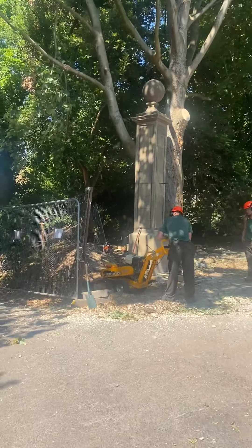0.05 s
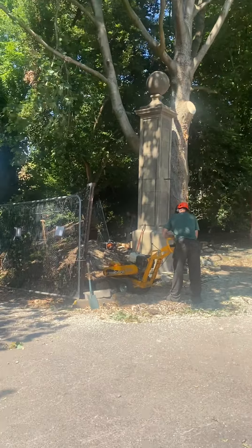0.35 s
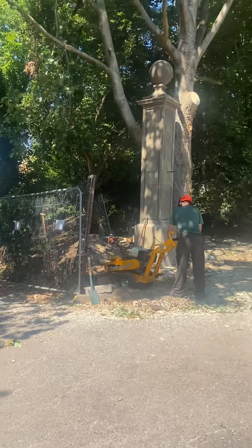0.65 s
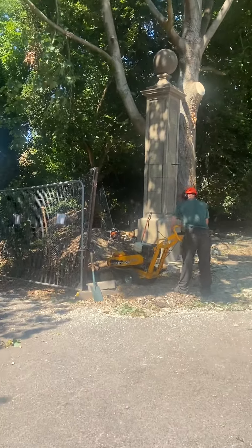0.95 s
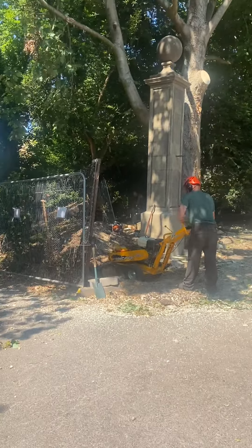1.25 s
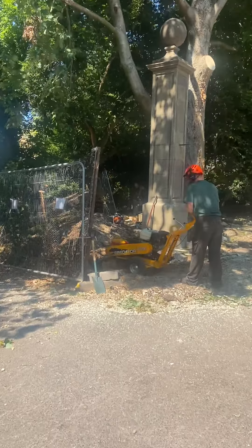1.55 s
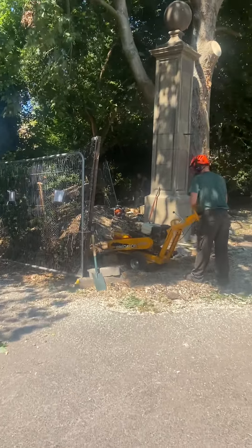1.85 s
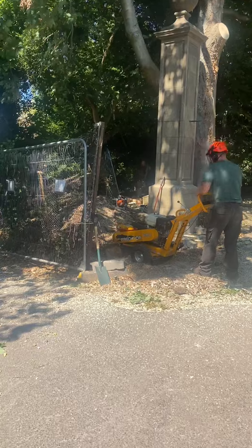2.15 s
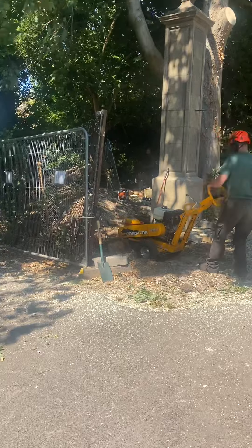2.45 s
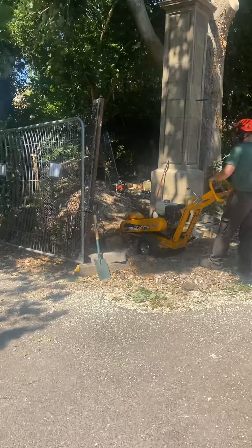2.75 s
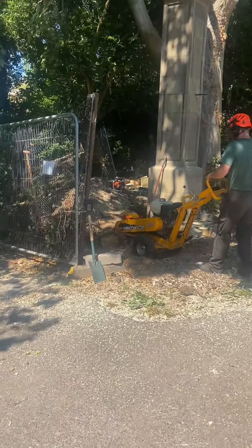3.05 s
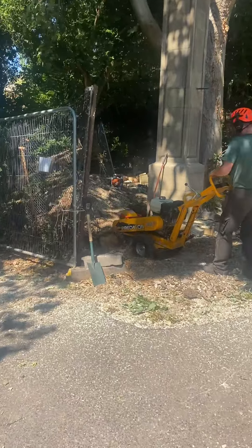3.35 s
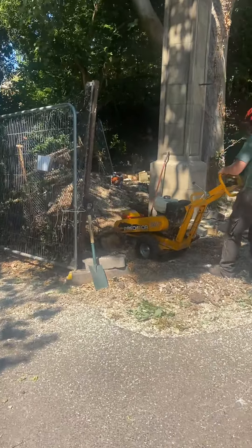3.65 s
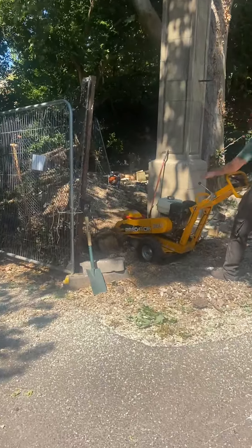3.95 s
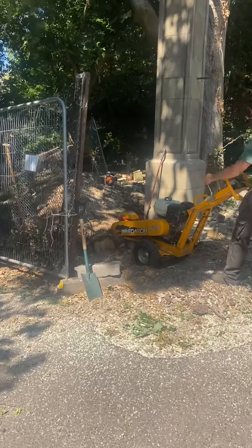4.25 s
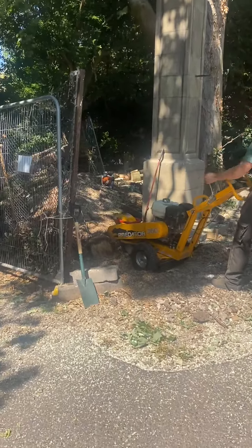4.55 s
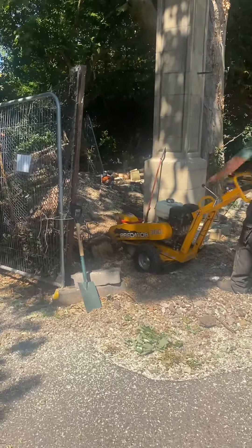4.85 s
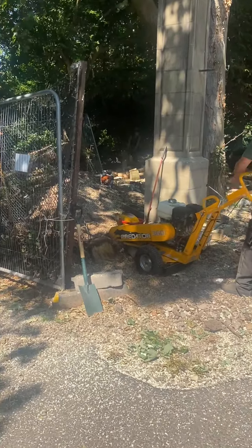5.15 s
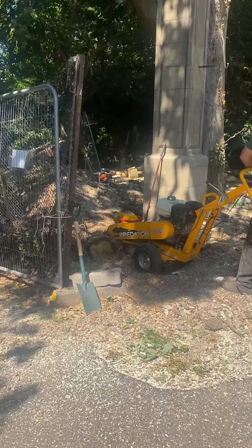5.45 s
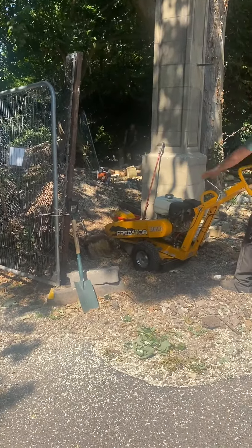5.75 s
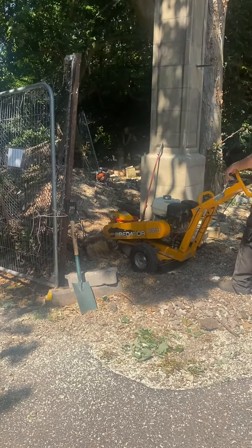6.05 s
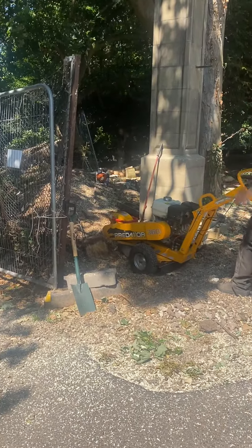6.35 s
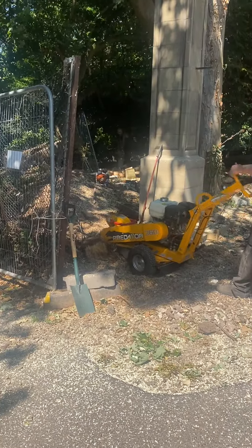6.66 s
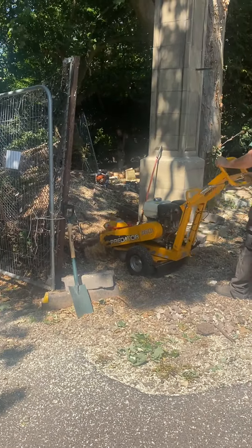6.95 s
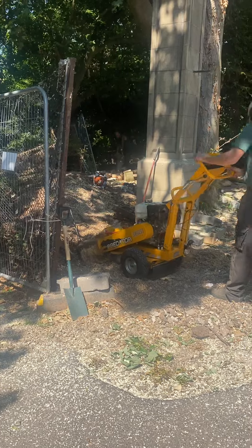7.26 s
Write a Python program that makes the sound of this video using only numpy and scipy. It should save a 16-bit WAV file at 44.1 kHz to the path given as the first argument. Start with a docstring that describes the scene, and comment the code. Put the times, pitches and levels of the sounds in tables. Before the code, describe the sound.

A stump grinder runs at full throttle outdoors, its throbbing engine and clattering cutter wheel growing louder as it gets closer.

```python
"""Stump grinder, approached on foot.

A walk-behind grinder runs at full throttle on a drive. Its single-cylinder four-stroke engine throbs
through muffler and airbox, knocks, and now and then misfires. The belt-driven cutter wheel hums and
churns through chips, narrow ringing bands come and go, and a few stones clink against the guard."""
import sys
import numpy as np
from scipy import signal
from scipy.fft import rfft, irfft
from scipy.io import wavfile
from scipy.ndimage import uniform_filter1d

SR = 44100
rng = np.random.default_rng(int(sys.argv[2]) if len(sys.argv) > 2 else 0)


def master(y):
    """Save y as 16-bit WAV."""
    cut = np.clip(np.atleast_2d(y).T, -1, 1)
    pcm = np.round(cut * 32767)  # scale
    wavfile.write(sys.argv[1], SR, pcm.astype(np.int16))


N = 326340
TIME, FREQ = np.arange(N) / SR, np.fft.rfftfreq(N, 1 / SR)
CYCLE_S = .0327  # nominal engine cycle: two crank turns, one firing

# walk to the machine (time [s], share of the way [0-1], exhaust level [dB], intake level [dB])
WALK = [(0, 0.14, -0.4, 1), (1.6, 0.2, 1.5, 0.5), (2.8, 0.44, 2, 1.6), (3.8, 0.63, 3.5, 1),
        (4.7, 0.63, 2.5, 2.5), (5.9, .84, 2.5, 2.5), (7.4, 1, 3, 4)]


def amp(db):
    """Decibels to gain."""
    return 10 ** (np.asarray(db) / 20)


def unit_rms(x):
    """Scale to rms 1."""
    return x / np.sqrt(np.mean(x ** 2) + 1e-20)


def follow(rows):
    """Each column of a time table at every sample."""
    times, *columns = np.transpose(rows)
    return [np.interp(TIME, times, column) for column in columns]


def gains(points):
    """(frequency [Hz], level [dB]) table to a gain per bin."""
    hz, db = np.transpose(points)
    return amp(np.interp(np.log(FREQ + 1), np.log(hz + 1), db))


def rolloff(hz, order):
    """Low-pass gain per bin."""
    return 1 / (1 + (FREQ / hz) ** order)


def colour(x, gain):
    """Filter by a gain per bin."""
    return irfft(rfft(x) * gain, N)


def wander(rate_hz):
    """Slow noise, rms 1."""
    return unit_rms(colour(rng.standard_normal(N), rolloff(rate_hz, 4)))


def narrow_noise(centre_hz, width_hz):
    """Noise band around a moving centre, rms 1."""
    r = np.exp(-np.pi * width_hz / SR)
    a, b = signal.lfilter([1], [1, -2 * r, r * r], rng.standard_normal((2, N)))
    angle = 2 * np.pi * np.cumsum(centre_hz) / SR
    return unit_rms(a * np.cos(angle) + b * np.sin(angle))


def clicks(cycles, spread_db):
    """One impulse of uneven size per cycle."""
    count = np.floor(cycles)
    return np.diff(count, prepend=count[0]) * amp(spread_db * rng.standard_normal(N))


def ring(x, modes):
    """Damped modes; neighbours swing in opposite directions, as along a pipe."""
    t = TIME[:SR // 4]
    response = sum((-1) ** k * amp(db) * np.exp(-np.pi * width_hz * t) * np.sin(2 * np.pi * hz * t)
                   for k, (hz, width_hz, db) in enumerate(modes))
    return signal.oaconvolve(x, response)[:N]


def nearness(close_share=0.74):
    """0 far from the machine, 1 close to it."""
    return np.clip(follow(WALK)[0] / close_share, 0, 1)


def misfires():
    """Every missed cycle as (time [s], strength)."""
    # misfire runs (start [s], length [cycles], strength [relative])
    runs = [(.583, 2, .9), (.876, 1, 1), (1.203, 1, 1), (1.695, 1, .45), (1.892, 1, 1.1), (3.294, 1, .45),
            (3.458, 3, 1), (3.723, 2, 1), (5.287, 4, 1), (5.715, 4, 1), (7.355, 2, 1)]
    return [(s + k * CYCLE_S, strength) for s, count, strength in runs for k in range(round(count))]


def firing_hz(sag_hz=.151, recover_s=.409):
    """Each misfire costs a little speed, which the governor wins back."""
    # governed speed, hunting slowly (time [s], cycle rate [Hz])
    governor = [(0, 30.291), (.4, 30.816), (.72, 30.99), (1.535, 30.571), (2.1, 30.677), (2.778, 30.839),
                (3.44, 30.549), (3.9, 30.718), (4.351, 30.966), (5.2, 30.8), (5.6, 30.651), (5.992, 30.512),
                (6.404, 30.853), (6.9, 30.755), (7.4, 30.562)]
    sag = sum(strength * (TIME > s) * np.exp(-abs(TIME - s) / recover_s) for s, strength in misfires())
    return follow(governor)[0] - sag_hz * sag


def engine(cycles, misfire_loss=0.87, backflow_phase=.203, intake_phase=.492):
    """Blasts ring the muffler, gulps the airbox; a misfire weakens the blast and sucks gas back."""
    # resonances (frequency [Hz], width [Hz], level [dB])
    muffler = [(88.7, 6.5, -25.5), (102.4, 29.7, -12.5), (165.6, 41, -10.5), (291, 33, -18)]
    airbox = [(65.7, 16.8, -18.5), (117.45, 20.1, -11.5)]
    tin_shroud = [(381, 150, -35.5)]
    backflow = [(79, 20.8, -10), (87.2, 20, -18.5), (151, 24, -12)]
    # deepest throb (time [s], level [dB])
    bass_level = [(0, -3), (1.6, -1.5), (2.2, -3), (3.1, -6), (3.8, 3), (4.6, -3.5), (5.6, 2.5), (7.4, -1)]
    _, exhaust_db, intake_db = follow(WALK)
    missed = sum(strength * (abs(TIME - s) < CYCLE_S / 2) for s, strength in misfires())
    blasts = clicks(cycles, spread_db=0.54) * (1 - misfire_loss * missed)
    sucks = clicks(cycles - backflow_phase, spread_db=3.6) * missed * amp(intake_db)
    gulps = clicks(cycles - intake_phase, spread_db=0.5) * amp(intake_db)
    # dull pop: the lowest mode swings against the upper ones
    pops = ring(sucks, backflow[:1]) - sum(ring(sucks, [mode]) for mode in backflow[1:])
    throb = ring(blasts * amp(exhaust_db), muffler) + pops + ring(gulps, airbox)
    throb += nearness() * ring(blasts, tin_shroud)
    throb += (amp(follow(bass_level)[0]) - 1) * colour(throb, rolloff(80, 10))
    upper_throb = colour(throb, 1 / (1 + ((FREQ - 289) / 29) ** 2))
    return throb - nearness() * upper_throb


def wheel_hum(cycles, wheel_ratio, slip_turns=.009, flutter_db=0.97):
    """Eight teeth beat the air; the belt slips a little."""
    # partials (order [per wheel turn], level [dB])
    orders = [(3, -17.5), (4, -2), (8, 0.2), (10, -20), (12, -14), (16, -16), (18, -21), (20, -20)]
    # hum envelope (time [s], level [dB])
    hum_level = [(0, -29.5), (.6, -30.5), (.95, -29.5), (1.42, -26), (1.7, -29.5), (2.15, -31.5),
                 (2.45, -26.5), (2.8, -28.5), (3.2, -36), (3.53, -32), (3.75, -29), (4.3, -25),
                 (4.8, -26.5), (5.25, -32), (5.95, -26.5), (6.1, -27.5), (6.25, -33.5), (6.8, -32.5),
                 (7.4, -26)]
    angle = 2 * np.pi * (wheel_ratio * cycles + slip_turns * wander(3.7))
    hum = sum(amp(db + flutter_db * wander(6.7)) * np.sin(round(k) * angle + 2 * np.pi * rng.random())
              for k, db in orders)
    return amp(follow(hum_level)[0] - 0.14) * hum


def knocks(cycles, tail_s=0.024):
    """Valves and piston ring the crankcase, each knock alike from cycle to cycle."""
    # knocks (phase [cycles], level [dB], centre [Hz], decay [s])
    impacts = [(.01, -9, 592, 0.0049), (.02, -12, 3850, 0.0085), (.285, -8, 860, 0.0013),
               (0.408, -15, 1712, 0.0019), (.6, -13, 1603, 0.013)]
    out, t = np.zeros(N), TIME[:SR // 20]
    for phase, db, hz, decay_s in impacts:
        crankcase = rng.standard_normal(len(t)) * (np.exp(-t / decay_s) + 0.79 * np.exp(-t / tail_s))
        hits = unit_rms(signal.oaconvolve(clicks(cycles - phase, spread_db=1.0), crankcase)[:N])
        band = 1 / np.sqrt(1 + (FREQ / hz - hz / FREQ.clip(1)) ** 2)
        out += amp(db) * colour(hits, band)
    return out


def chip_flow(rate_hz=9, slowest_hz=2):
    """Uneven flow of chips through the wheel, no slow drift, rms 1."""
    return unit_rms(colour(wander(rate_hz), FREQ > slowest_hz))


def treble_flicker(x, ripple_db=2.3, flicker_db=3.0, above_hz=1950):
    """Random slow ripple and brief patches make the treble flicker and shift in colour."""
    hz, t, spectrum = signal.stft(x, SR, nperseg=1024, noverlap=768)

    def patches(width_hz, length_s):
        """Random field over frequency and time, rms 1."""
        field = uniform_filter1d(rng.standard_normal(spectrum.shape), round(width_hz / hz[1]), axis=0)
        return unit_rms(uniform_filter1d(field, round(length_s / t[1]), axis=1))

    db = ripple_db * patches(100, .7) + flicker_db * patches(130, .08)
    db /= 1 + (above_hz / hz.clip(1)[:, None]) ** 3
    gain = amp(db) / np.sqrt(np.mean(amp(db) ** 2, axis=1, keepdims=True))
    return signal.istft(spectrum * gain, SR, nperseg=1024, noverlap=768)[1][:N]


def clatter(cycles, wheel_ratio, churn_db=1.14, knock_db=4.0, split_hz=1800):
    """Knocks plus chip noise that swells once a wheel turn; louder and fuller close by."""
    # clatter spectra, far and close (frequency [Hz], level [dB])
    far_shape = [(220, -28.5), (370, -9.5), (492, -1.5), (590, -11.5), (800, -8), (1150, -8.5),
                 (1650, -11.5), (1860, -16.5), (2090, -16.5), (2750, -17.5), (3870, -23.5), (4300, -23.5),
                 (5200, -28), (6300, -48), (8000, -79)]
    close_shape = [(220, -35), (370, -3.5), (590, -2.5), (730, -1.5), (880, -4.5), (1100, -6), (1450, -11),
                   (1850, -10), (2450, -13.5), (3200, -16.5), (3800, -18), (4500, -21.5), (5200, -22.5),
                   (5550, -34.5), (6300, -55), (8000, -80)]
    swell = 1 + .14 * np.cos(2 * np.pi * wheel_ratio * cycles)
    knocking = amp(knock_db) * knocks(cycles)
    near, low = nearness(), rolloff(split_hz, 8)
    out = np.zeros(N)
    for band, far_db, close_db in ((low, -35.5, -26.5), (1 - low, -41.5, -38)):
        drive = rng.standard_normal(N) * swell * amp(churn_db * chip_flow()) + knocking
        far = unit_rms(colour(drive, band * gains(far_shape)))
        close = unit_rms(colour(drive, band * gains(close_shape)))
        out += amp(far_db + near * (close_db - far_db)) * ((1 - near) * far + near * close)
    return treble_flicker(out)


def reflections(x, above_hz=1000, below_hz=3900):
    """Three early bounces comb the lower treble; rough ground scatters the rest."""
    # ground bounce, lagging more on approach (time [s], delay [s])
    ground = [(0, .00165), (1.2, .00165), (1.4, .00156), (2, .00172), (2.6, .00178), (3.4, .00182),
              (4.7, .00185), (5.25, .00221), (6.1, .00229), (6.6, .00222), (7.1, .0021), (7.4, .00212)]
    delay_s = follow(ground)[0]
    treble = colour(x, (1 - rolloff(above_hz, 3)) * rolloff(below_hz, 6))
    paths = ((-.29, delay_s), (.15, delay_s + .00059), (.14 * nearness(), .00079))
    return x + sum(gain * np.interp(TIME - lag_s, TIME, treble) for gain, lag_s in paths)


def ringing_bands(cycles, floor=0.098, flutter_db=0.5, pulse_db=3.0, pulse_phase=0.17):
    """Narrow ringing noise bands swell, glide and fade during the walk, pulsing each engine cycle."""
    # bands (centre [Hz], width [Hz], level [dB], peak time [s], swell sigma [s], glide [Hz/s])
    bands = [(411, 35, -38.5, 0.17, .17, 0.5), (681, 87, -43.5, .3, .7, 0.5),
             (771.5, 100, -33, 4.45, .5, 0), (2800, 170, -48.5, 0.65, 0.39, 1),
             (723, 76, -38.5, 7.4, .41, 0), (1069, 54, -42.5, 5, 0.85, 0.5),
             (1338, 95, -38.5, 2.45, .5, -69.5), (1205, 200, -41.5, 3.5, .6, 0),
             (1664, 78, -43.5, 0.56, 0.53, 0), (1446, 53, -46.5, 0.27, .3, 1.5),
             (1471, 130, -43, 5.2, 0.75, 0), (2060, 60, -46.5, 5.3, 1, 1), (2130, 60, -47, 7.2, .25, 150),
             (2374, 56, -43.5, 5.62, 0.6, -0.5), (2535, 44, -48.5, 3.4, 0.49, -1),
             (2460, 80, -47, 7.1, .35, 200.5), (2635, 130, -46.5, 2.15, .45, -260),
             (2670, 87, -47.5, 4.4, 0.18, -1100), (2935, 50, -44, 6.36, .32, 69.5),
             (3100, 70, -47.5, 7.2, .22, 220), (2964, 130, -46.5, 4.2, 0.45, 0),
             (3470, 80, -46.5, 3.55, .14, 0), (3600, 190, -47, 4.25, 0.25, -150),
             (3810, 170, -46, 1.12, .17, 99.5), (3880, 110, -51, 4.85, 0.19, -1200),
             (3850, 80, -55, 4.9, .2, 0), (3850, 60, -51, 6, .22, 120.5),
             (4150, 70, -52.5, 7.15, 0.14, 200.5)]
    pulse = np.cos(2 * np.pi * (cycles - pulse_phase)) - 0.17
    gain = amp(flutter_db * chip_flow() + pulse_db * pulse)
    out = np.zeros(N)
    for hz, width_hz, db, peak_s, sigma_s, glide in bands:
        swell = floor + (1 - floor) * np.exp(-.5 * ((TIME - peak_s) / sigma_s) ** 2)
        centre_hz = hz + glide * np.clip(TIME - peak_s, -2 * sigma_s, 2 * sigma_s)
        out += amp(db) * swell * narrow_noise(centre_hz, width_hz)
    return gain * out


def exhaust_rumble(cycles, level_db=-33.5, puff_db=2.5, puff_phase=0.26):
    """Low noise of exhaust gas, rushing once a cycle."""
    # gas noise spectrum (frequency [Hz], level [dB])
    shape = [(20, -18), (45, -6.5), (90, -3.5), (170, 0), (280, 0), (400, -10), (600, -13.5), (1500, -50.5)]
    puff = np.cos(2 * np.pi * (cycles - puff_phase))
    gas = unit_rms(colour(rng.standard_normal(N), gains(shape)))
    return amp(level_db + follow(WALK)[2] + puff_db * puff) * gas


def stones(scrape_decay_s=0.007, ping_decay_s=0.014):
    """Stones and chips scrape and ring the steel guard, each spot with its own note."""
    # strikes (time [s], scrape level [dB], note [Hz], note level [dB])
    strikes = [(0.029, -39, 3030, -29), (0.047, -42.5, 3080, -32.5), (1.35, -30.5, 1405, -26.5),
               (1.358, -27, 3030, -27.5), (1.37, -25.5, 3400, -45), (1.378, -30.5, 1664, -29),
               (1.381, -39.5, 643, -24.5), (1.384, -34.5, 1497, -29.5), (1.396, -36, 4274, -44),
               (1.412, -37, 2100, -32), (1.436, -45.5, 3630, -37), (1.49, -37.5, 3000, -36),
               (1.532, -40, 2940, -39), (4.703, -26, 726, -17), (6.046, -39.5, 2970, -36),
               (6.372, -36, 1404, -25.5), (7.283, -28, 3260, -32)]
    # guard modes (frequency [Hz], width [Hz], level [dB])
    guard = [(1450, 71, -3), (2150, 60, 1), (2940, 62, 6.5), (3500, 78, 8.5), (4000, 60, 2.5),
             (4130, 92, 2)]
    envelope, pings = np.zeros((2, N))
    for s, scrape_db, hz, note_db in strikes:
        age_s = abs(TIME - s)
        envelope += amp(scrape_db) * (TIME > s) * np.exp(-age_s / scrape_decay_s)
        note = np.exp(-age_s / ping_decay_s) * np.sin(2 * np.pi * hz * age_s)
        pings += amp(note_db) * (TIME > s) * note
    scrape = envelope * rng.standard_normal(N)
    crack = colour(scrape, gains([(300, -9.5), (1000, 10.5), (4400, -2.5), (5400, -6.5), (6400, -35)]))
    ringing = np.std(scrape) * unit_rms(ring(scrape, guard))
    return amp(0.5) * crack + amp(-6) * ringing + pings


def band_limit(x, hz):
    """Steep low-pass on both channels."""
    taps = signal.firwin(255, hz, window=("kaiser", 9), fs=SR)
    return signal.oaconvolve(x, taps[None], "same")


def scene(wheel_ratio=1.2993):
    """Machine slightly left; ground and wall scatter its upper range between the ears."""
    # side against mid (frequency [Hz], level [dB])
    width = [(100, -27), (250, -24.5), (420, -13.5), (600, -10.5), (800, -2.5), (1100, -2.5), (1550, -9.5),
             (1850, 0), (2200, 0), (2700, 2), (3500, -1), (4500, 3.5), (6000, 3.5)]
    # direct part of the side signal (frequency [Hz], share [0-1])
    direct_share = [(600, .93), (1200, .65), (2200, .82), (4500, 0.7)]
    cycles = .1416 + np.cumsum(firing_hz()) / SR
    rumble = exhaust_rumble(cycles)
    mid = engine(cycles) + wheel_hum(cycles, wheel_ratio) + reflections(clatter(cycles, wheel_ratio))
    mid += ringing_bands(cycles) + rumble + stones()
    scattered = reflections(clatter(cycles, wheel_ratio)) + ringing_bands(cycles) + stones()
    direct = np.interp(FREQ, *np.transpose(direct_share))
    side = colour(mid, 1j * direct * gains(width))  # 90 degree shift: the left ear leads
    side += colour(scattered, np.sqrt(1 - direct ** 2) * gains(width))
    lean = gains([(60, .25), (130, .15), (300, -0.25), (600, -.3), (1200, 0.13), (4000, -0.75)])
    return np.array([colour(mid + side, lean), colour(mid - side, 1 / lean)])


def record(dry, low_hz=33, edge_hz=6550, whine_hz=12000, whine_db=-66, top_hz=12500):
    """Cut the deepest bass and top treble; mirror the throb as a very faint high whine."""
    bass_cut = np.array([colour(x, 1 - rolloff(low_hz, 6)) for x in dry])
    thin = band_limit(bass_cut, edge_hz)
    whine = amp(whine_db) * thin.mean(0) * np.cos(2 * np.pi * whine_hz * TIME)
    return band_limit(thin + whine, top_hz)


dry = scene()
out = record(dry)
master(out)
```